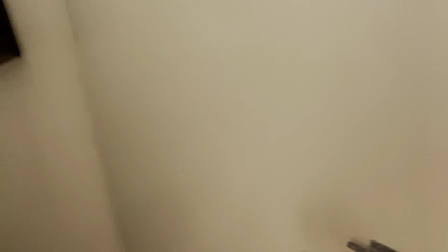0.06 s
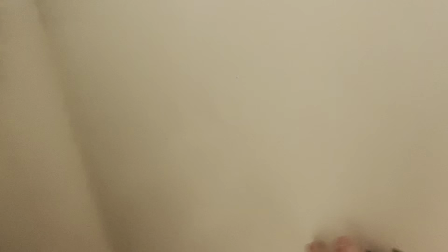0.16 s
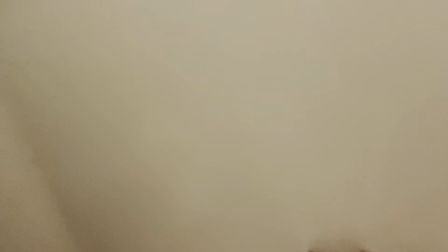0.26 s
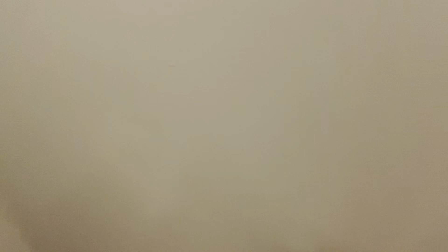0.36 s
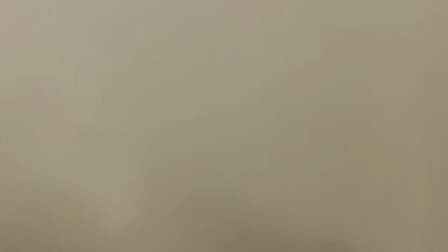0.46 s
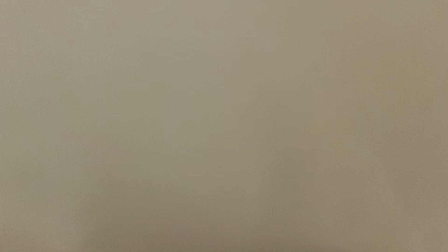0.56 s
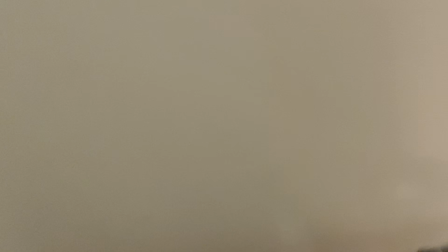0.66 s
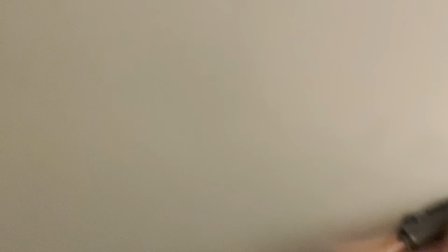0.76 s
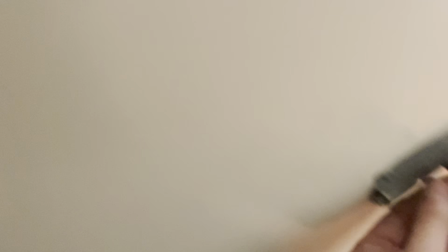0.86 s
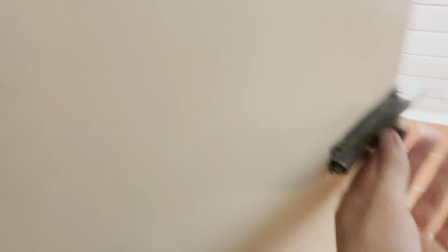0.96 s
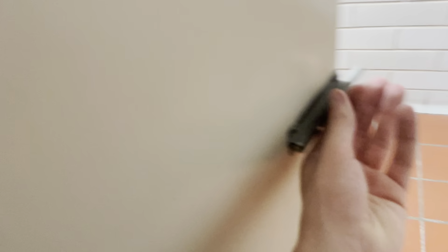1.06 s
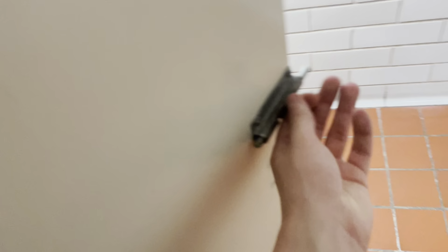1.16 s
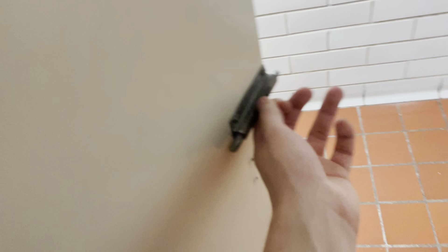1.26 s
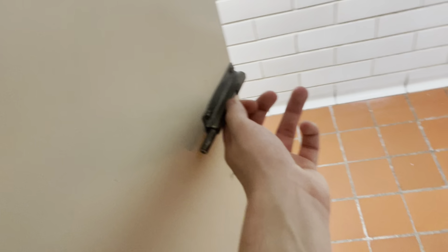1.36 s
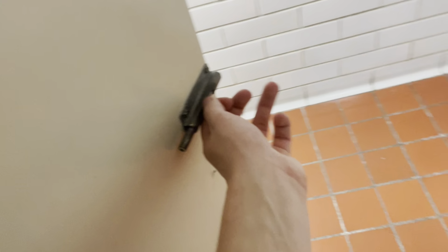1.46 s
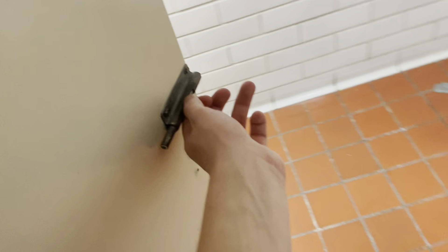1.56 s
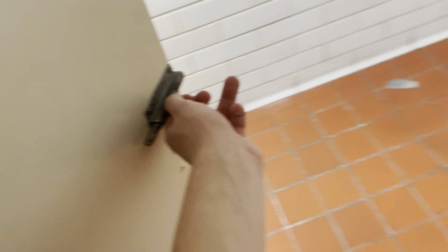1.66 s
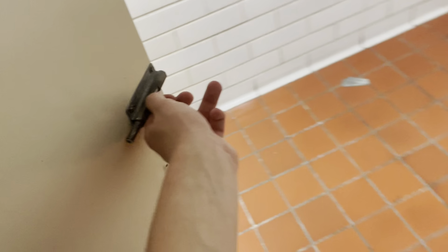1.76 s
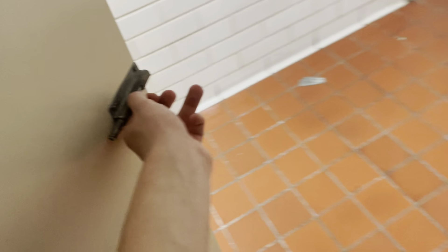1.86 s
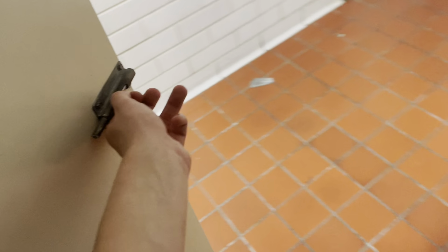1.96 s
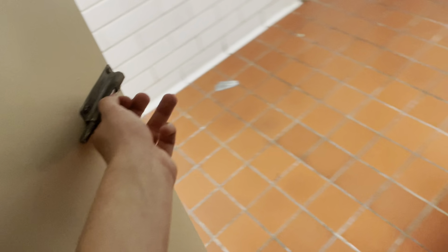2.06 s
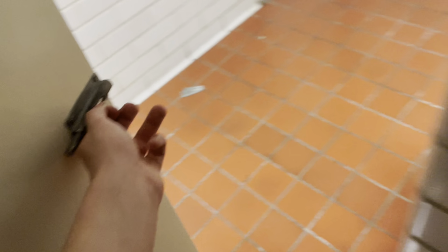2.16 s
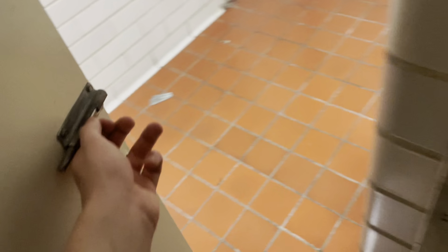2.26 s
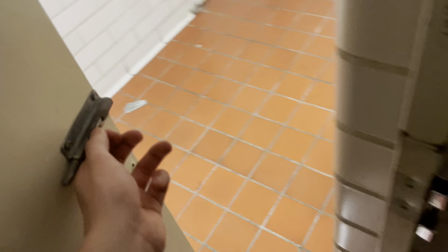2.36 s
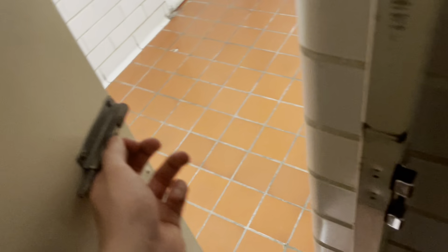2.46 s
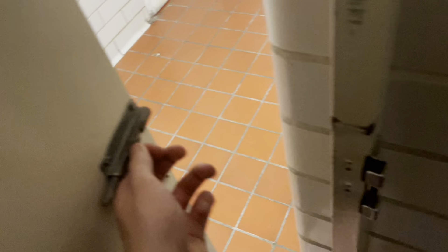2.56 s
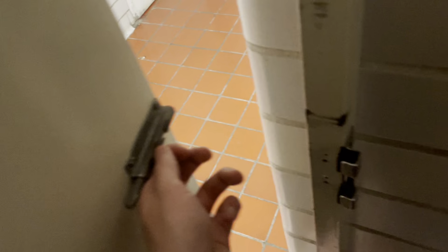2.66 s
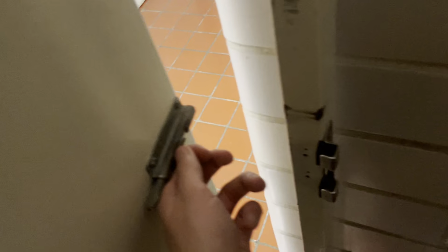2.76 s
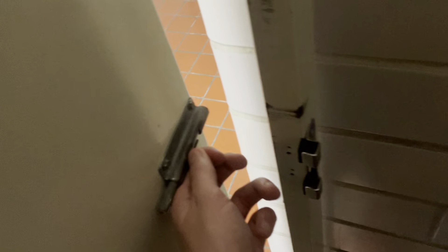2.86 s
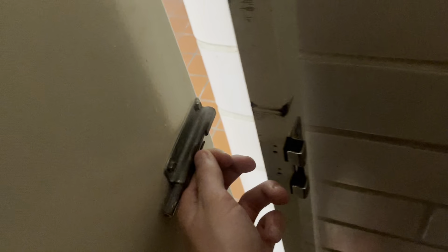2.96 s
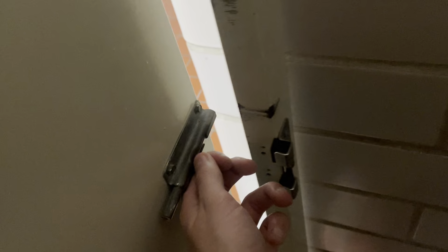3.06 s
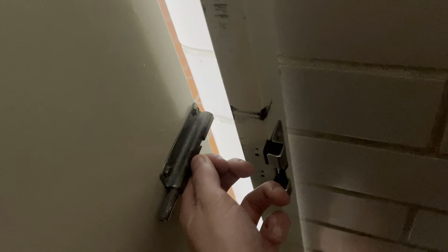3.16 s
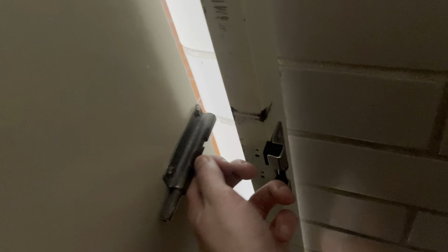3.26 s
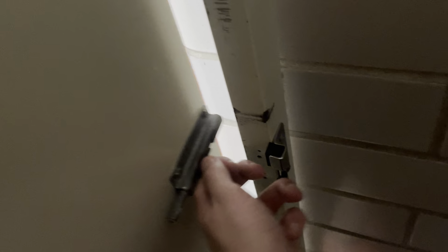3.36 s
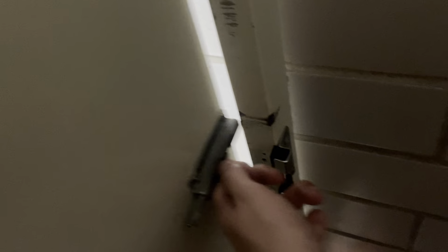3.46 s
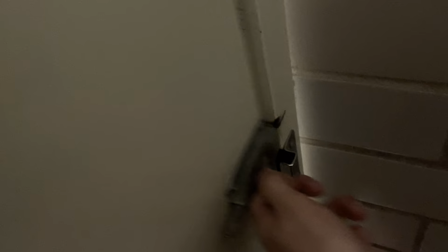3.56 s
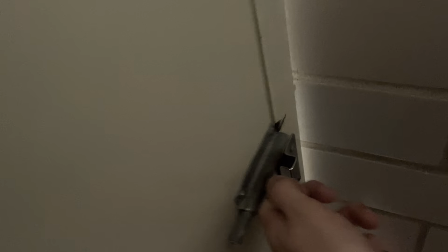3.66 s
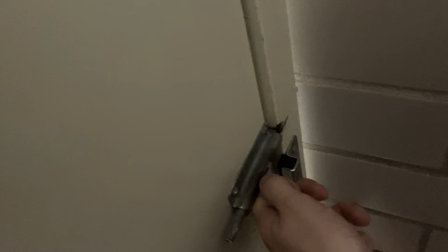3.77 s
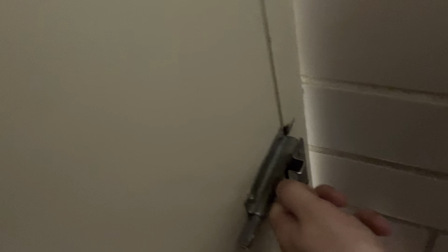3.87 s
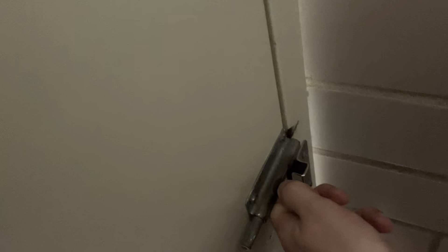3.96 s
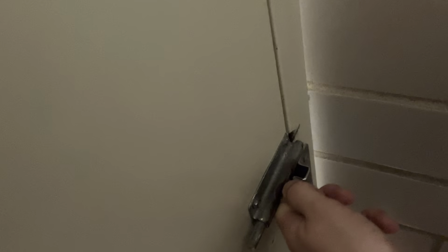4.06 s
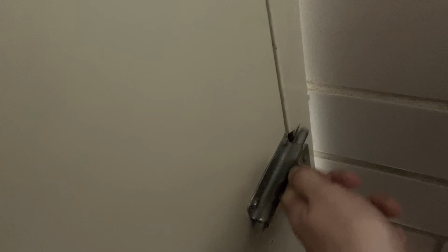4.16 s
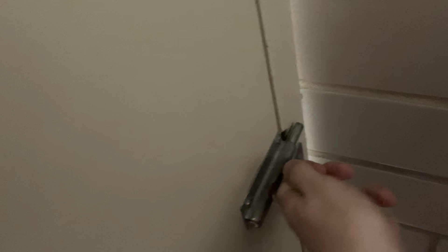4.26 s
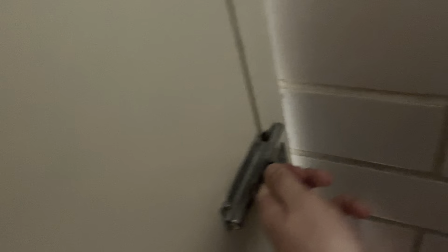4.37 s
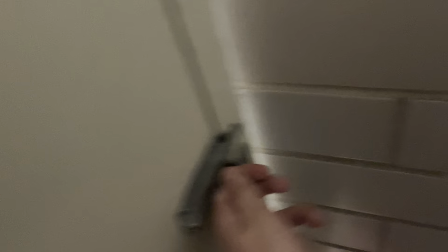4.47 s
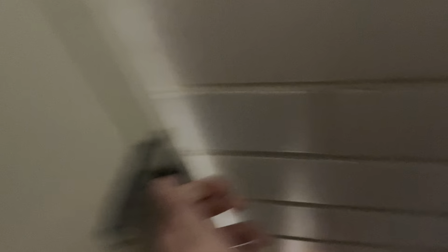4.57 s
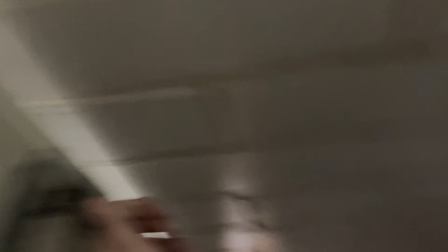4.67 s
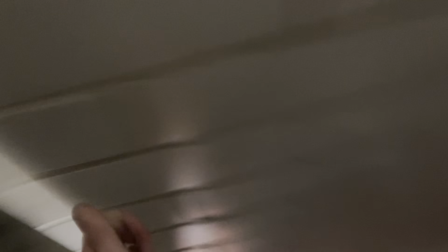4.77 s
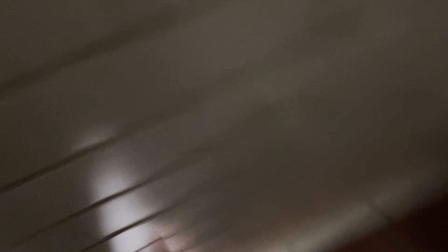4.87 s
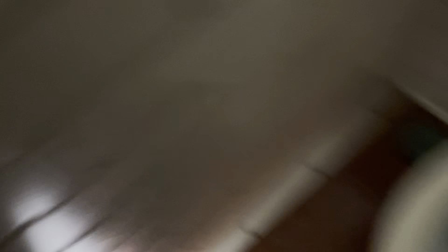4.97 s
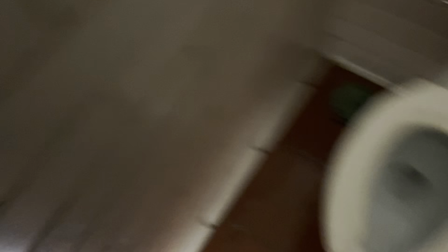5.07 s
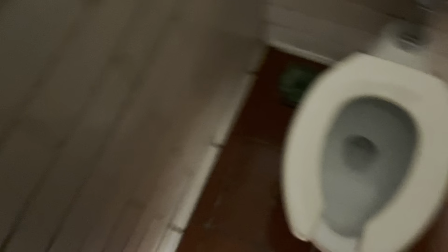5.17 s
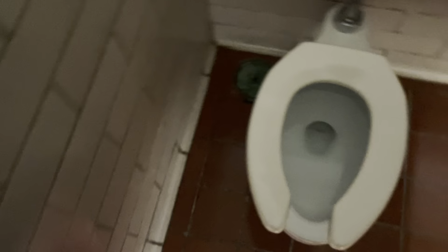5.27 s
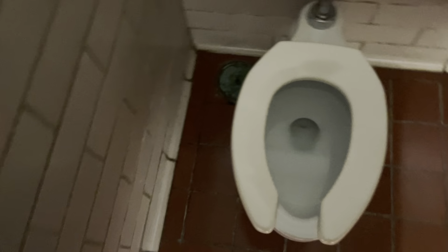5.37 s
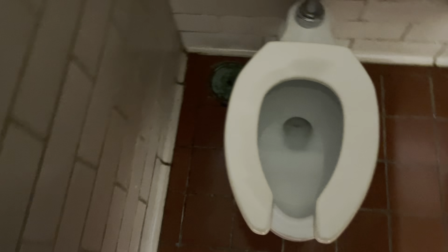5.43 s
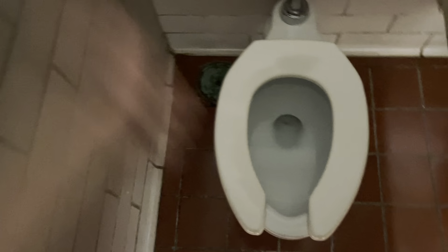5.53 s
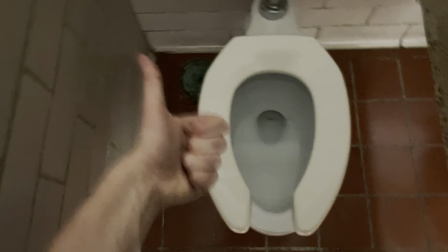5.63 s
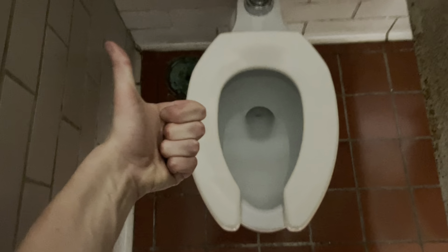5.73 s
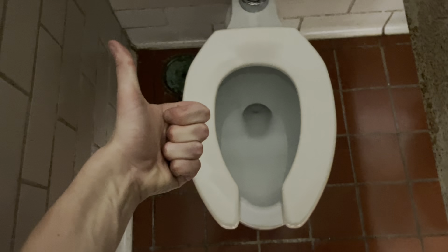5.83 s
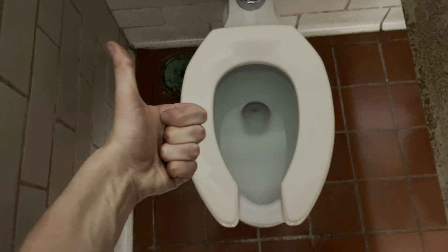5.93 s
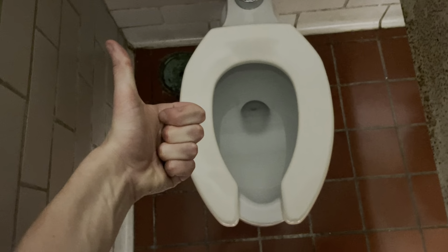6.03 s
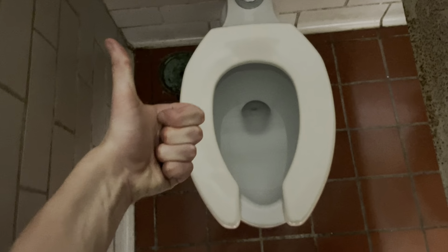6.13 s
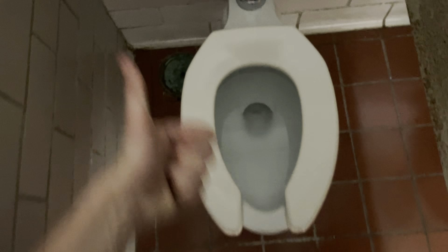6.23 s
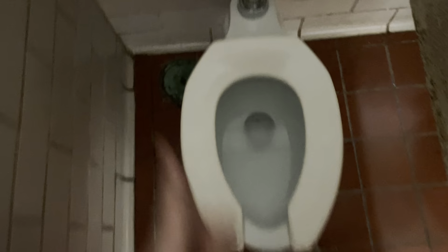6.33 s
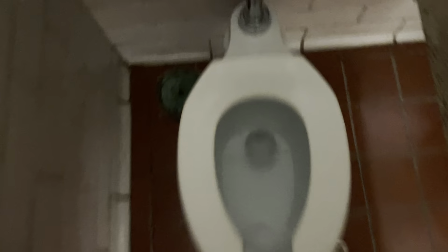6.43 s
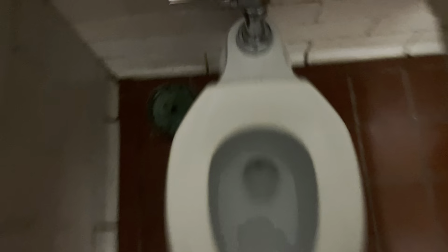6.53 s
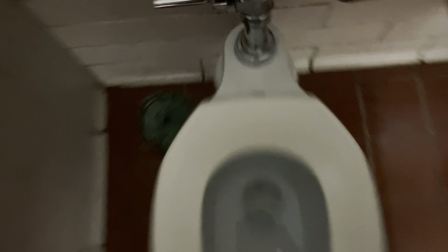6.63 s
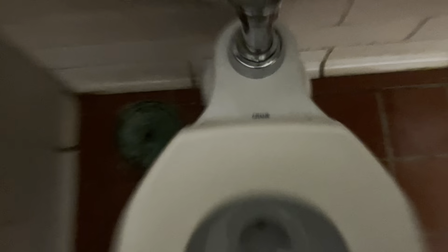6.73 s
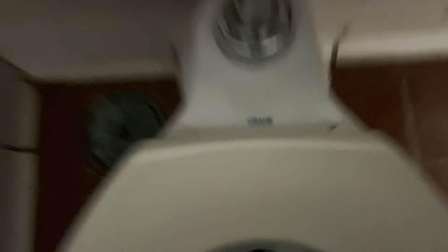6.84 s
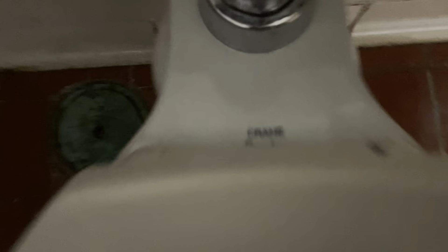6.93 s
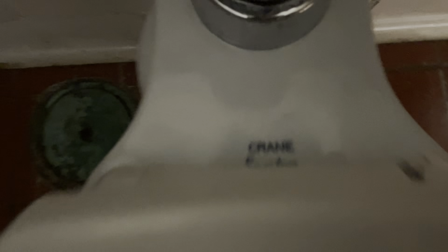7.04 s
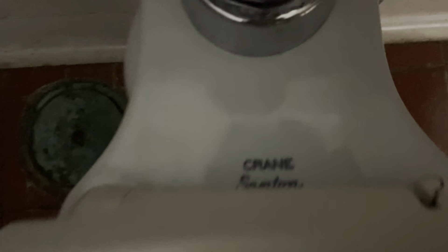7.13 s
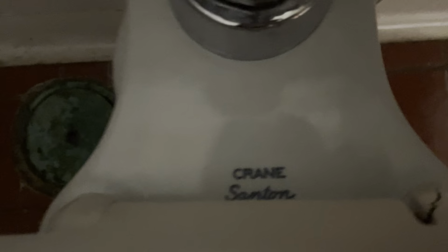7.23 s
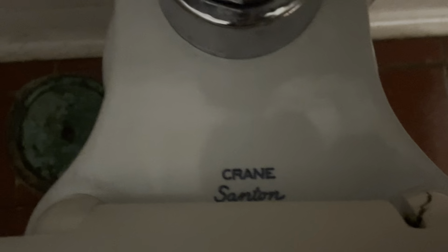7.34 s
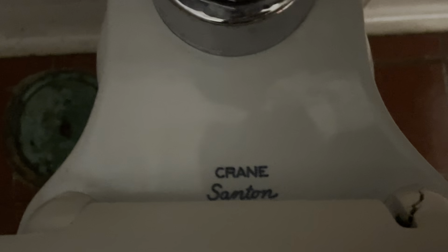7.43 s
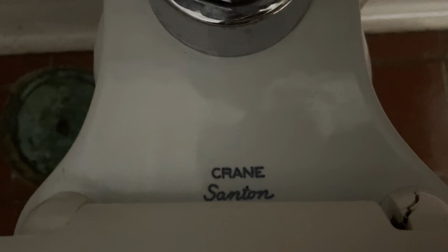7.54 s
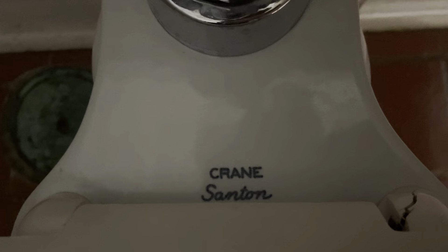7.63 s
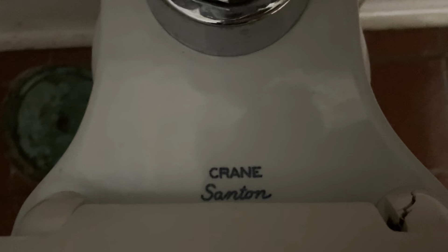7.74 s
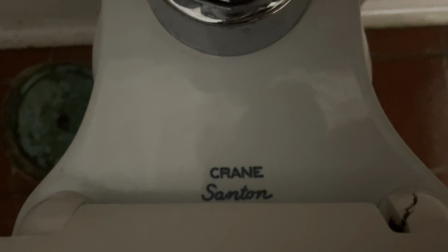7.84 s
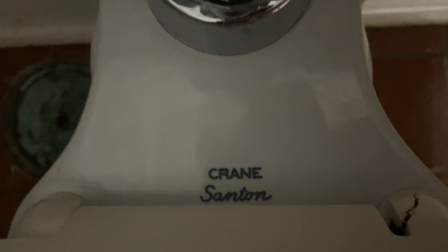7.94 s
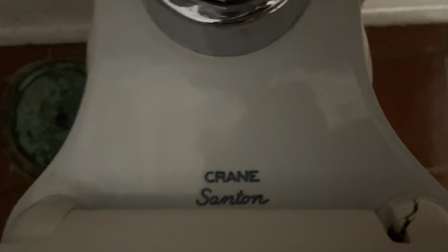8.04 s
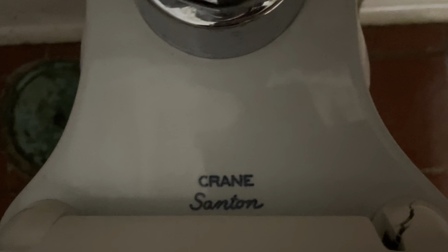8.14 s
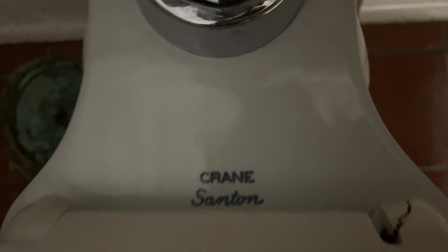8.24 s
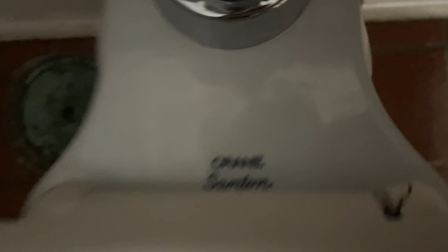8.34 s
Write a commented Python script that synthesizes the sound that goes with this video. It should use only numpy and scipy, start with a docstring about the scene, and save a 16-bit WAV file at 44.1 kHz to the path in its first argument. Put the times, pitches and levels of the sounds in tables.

```python
"""In a tiled restroom a stall door is swung shut: its loose slide bolt rattles in the hand, the panel
bangs on the frame, and the bolt is worked into its keeper. Then clothes rustle, a shoe lands and
fingers bump the microphone, over a low ventilation rumble. Metal and panel are struck resonators;
rubbing, airflow and reverberation are shaped noise."""
import sys
import numpy as np
from scipy import signal
from scipy.fft import rfft, irfft, next_fast_len
from scipy.io import wavfile

SR = 44100
rng = np.random.default_rng(int(sys.argv[2]) if len(sys.argv) > 2 else 0)


def wrap_up_sound(samples):
    """Save the sound to the file named by the first command line argument, as 16-bit audio."""
    columns = np.atleast_2d(samples).T
    # keep every value between -1 and 1, then stretch to whole-number steps
    tamed = np.clip(columns, -1, 1)
    steps = np.round(tamed * 32767).astype(np.int16)
    wavfile.write(sys.argv[1], SR, steps)


N = 370440
TIME = np.arange(N) / SR


def from_db(db):
    """Decibel law: 20 dB is a factor of ten in amplitude."""
    return 10 ** (np.asarray(db) / 20)


def rms_one(x):
    """Normalization to unit effective value."""
    return x / np.sqrt(np.mean(x ** 2) + 1e-20)


def unit_energy(x):
    """Normalization to unit energy, averaged over the channels."""
    return rms_one(x) / np.sqrt(x.shape[-1])


def peak_one(x):
    """Normalization to unit peak."""
    return x / np.abs(x).max()


def level_curve(rows):
    """Amplitude envelope: levels in decibels joined by straight lines."""
    return from_db(np.interp(TIME, *np.transpose(rows)))


def at_hz(points, hz):
    """Interpolation along a logarithmic frequency axis."""
    points = np.array(points)
    return np.interp(np.log(hz), np.log(points[:, 0]), points[:, 1])


def panned(balance_db):
    """Interaural level difference: gains for left and right, positive towards the left."""
    return from_db([[balance_db / 2], [-balance_db / 2]])


def butter(x, hz, kind, order=2):
    """Butterworth filtering: a maximally flat passband."""
    corner_hz = np.clip(hz, 10, SR * .45)
    sections = signal.butter(order, corner_hz, kind, fs=SR, output="sos")
    return signal.sosfilt(sections, x + 1e-18)


def add(track, s, sound):
    """Superposition: mixes a sound into a track at a time in seconds."""
    at = max(round(s * SR), 0)
    track[..., at:at + sound.shape[-1]] += sound[..., :N - at]


def convolve(x, response):
    """Linear convolution: plays a signal through a stereo impulse response."""
    return signal.oaconvolve(np.atleast_2d(x), response, axes=-1)[:, :N]


def drift(rate):
    """Random modulation: normal values, rate per second, joined by straight lines."""
    return np.interp(TIME * rate, np.arange(4000), rng.standard_normal(4000))


def stroke(length_s):
    """Envelope of rubbing: the movement swells, holds and lets go."""
    return signal.windows.tukey(max(int(length_s * SR), 2), .5)


def resonate(force, modes, spread_db=0):
    """Modal superposition: parallel two-pole resonances, their strengths varied by spread_db."""
    out = 0
    for hz, width_hz, db in modes:
        r = np.exp(-np.pi * width_hz / SR)
        zeros = [(1 - r * r) / 2, 0, (r * r - 1) / 2]
        poles = [1, -2 * r * np.cos(2 * np.pi * hz / SR), r * r]
        mode = signal.lfilter(zeros, poles, force)
        out = out + from_db(db + spread_db * rng.standard_normal()) * mode
    return out


def treble_dip(x, notch_hz=8350, notch_q=5):
    """Notch filter: a narrow dip in the treble, near 8.35 kHz."""
    return signal.lfilter(*signal.iirnotch(notch_hz, notch_q, fs=SR), x)


def beside_panel(x, lag_radians=1.9, lean_db=2.0, hollow_db=6.0):
    """Near field: the panel's low swing reaches the left port late and louder, most in the low middle."""
    split_hz = 430
    # the left channel's lows feed both ports, turned half the lag each way
    wave = signal.hilbert(butter(x[0], split_hz, "low", order=4))
    turn = np.exp(.5j * lag_radians * np.array([[-1], [1]]))
    low = (wave * turn).real * panned(lean_db)
    low = low + (panned(2 * hollow_db) - 1.5) * butter(low, [240, 380], "band", order=1)
    return low + butter(x, split_hz, "high", order=4)


# Likeness of the left and right noise: (pitch_hz, correlation [-1 to 1])
LIKENESS = [(50, 0.22), (130, 0.77), (1400, 0.31), (7000, 0.044)]


def stereo(mid, side, hz):
    """Interchannel coherence: left and right from two unrelated noises, alike as the room makes them."""
    alike = np.clip(at_hz(LIKENESS, hz), -1, 1)
    return np.sqrt(1 + alike) * mid + np.sqrt(1 - alike) * side * [[1], [-1]]


def noise(spectrum, size, t60s):
    """Frequency-dependent decay: stereo third-octave noises each die at their own rate; rms 1."""
    t, out = np.arange(size) / SR, 0
    bins, white = np.fft.rfftfreq(size, 1 / SR), rfft(rng.standard_normal((2, size)))
    half_band = 2 ** (1 / 6)
    for hz in 25 * 2 ** (np.arange(29) / 3):
        inside = (bins >= hz / half_band) * (bins < hz * half_band)
        mid, side = irfft(white * inside, size)
        decay = np.exp(-np.log(1000) * t / at_hz(t60s, hz))
        band = stereo(mid, side, hz) * decay
        # band amplitude follows the density times the root of the bandwidth
        out = out + from_db(at_hz(spectrum, hz)) * np.sqrt(hz) * rms_one(band)
    return rms_one(out)


def steady_noise(spectrum):
    """Spectral shaping: steady stereo noise of a given colour; rms 1."""
    size = next_fast_len(N)
    hz = np.maximum(np.fft.rfftfreq(size, 1 / SR), 1)
    mid, side = rfft(rng.standard_normal((2, size))) * from_db(at_hz(spectrum, hz))
    return rms_one(irfft(stereo(mid, side, hz), size)[:, :N])


# Reverberation times of the tiled room: (pitch_hz, t60_s)
ROOM_T60 = [(60, 4.1), (160, 1.2), (1000, 0.58), (14000, 0.43)]
# Decay times within the stall: (pitch_hz, t60_s)
STALL_T60 = [(60, 0.31), (5000, 0.1), (14000, 0.63)]


def reverberant(spectrum, room_db):
    """Coupled reverberation: a dense ring in the stall plus the tiled room's longer tail; energy 1."""
    stall = noise(spectrum, SR, STALL_T60)
    room = noise(spectrum, SR, ROOM_T60)
    return unit_energy(stall + from_db(room_db) * room)


# Ventilation level as the microphone turns: (start_s, level_db)
VENT = [(0, -45.5), (1.5, -52.5), (3.4, -54.5), (4.3, -45), (5.0, -51), (6.3, -58.5), (6.9, -48),
        (7.5, -57.5), (8.4, -51)]
# Spectrum of the moving air: (pitch_hz, density_db [dB per Hz])
AIR = [(25, -11.5), (55, 3), (100, -2.5), (200, -9.5), (450, -30), (950, -27), (1350, -40), (2400, -40),
       (3500, -45), (16000, -58.5)]


def ventilation(lean_db=1.5):
    """Broadband flow noise: a low, slightly uneven rumble fills the room."""
    return level_curve(VENT) * from_db(drift(10)) * steady_noise(AIR) * panned(lean_db)


# Sleeve or trouser leg brushing with each movement: (start_s, length_s, level_db)
BRUSHES = [(0.212, 0.69, -63), (1.021, 0.56, -63), (1.697, 0.52, -67), (2.224, 0.04, -54.5),
           (2.587, 0.022, -62), (4.777, 0.13, -64), (4.958, 0.09, -60), (5.232, 0.045, -58),
           (5.44, 0.035, -71), (5.951, 0.11, -61.5), (6.194, 0.086, -64), (6.441, 0.22, -53.5),
           (6.558, 0.65, -61.5)]
# Spectrum of rubbed cloth: (pitch_hz, density_db [dB per Hz])
CLOTH = [(400, -8), (750, -13.5), (1100, -6.5), (1600, -14), (2350, -9.5), (7300, -20.5), (8100, -47.5),
         (9230, -23), (13300, -28.5), (15000, -62)]
# Even reflection of the rustle by the tiles: (pitch_hz, density_db [dB per Hz])
EVEN = [(1000, 0)]


def clothes(snaps_per_s=260, snap_db=4, scuff_db=3, wet_db=-2, room_db=0):
    """Fabric friction: brushes swell in uneven scuffs with tiny snaps of the folds, and linger."""
    rubbing = np.zeros(N)
    for s, length, db in BRUSHES:
        add(rubbing, s, from_db(db) * stroke(length))
    # snaps fall at random and each dies away in about a millisecond
    snaps = (rng.random(N) < snaps_per_s / SR) * np.minimum(rng.exponential(1, N), 3)
    snaps = signal.lfilter([1], [1, -np.exp(-1 / (.001 * SR))], snaps)
    scuffs = from_db(scuff_db * drift(40))
    folds = rms_one(1 + from_db(snap_db) * snaps)
    cloth = rubbing * scuffs * folds * steady_noise(CLOTH)
    return cloth + from_db(wet_db) * convolve(cloth, reverberant(EVEN, room_db))


# Finger knocks on the microphone housing: (start_s, level_db, lowpass_hz)
BUMPS = [(2.991, -42.5, 596), (3.087, -45, 1087), (4.807, -41.5, 663), (5.505, -38.5, 495),
         (5.565, -43, 436), (5.743, -39, 827), (5.84, -40.5, 483), (6.072, -42.5, 444), (6.168, -38, 536),
         (6.564, -34, 438), (6.654, -41.5, 453), (8.323, -34, 414)]
# Light touches while the grip shifts, one row: (start_s, end_s, mean level_db, highest lowpass_hz)
FIDGET = (5.5, 6, -51.5, 718)
TOUCH_COUNT = 28


def bumps(decay_s=0.0081, highest_thump_hz=110, thump_db=-8):
    """Structure-borne sound: fingers give dull, dry knocks over a soft thump, and lighter touches."""
    out, t = np.zeros((2, N)), np.arange(4096) / SR
    thump_s = .012  # time to the thump's fullest swing
    start_s, end_s, touch_db, touch_hz = FIDGET
    touches = []
    for _ in range(TOUCH_COUNT):
        touches.append((rng.uniform(start_s, end_s), rng.normal(touch_db, 1.4),
                        touch_hz * rng.uniform(0.56, 1)))
    for s, db, high_hz in BUMPS + touches:
        # one part common to both channels, one part separate
        push = rng.standard_normal(len(t)) + .5 * rng.standard_normal((2, len(t)))
        knock = butter(push * np.exp(-t / decay_s), high_hz, "low", order=4)
        knock = butter(knock, 150, "high")
        thump_hz = highest_thump_hz * rng.uniform(0.43, 1)
        thump = t / thump_s * np.exp(1 - t / thump_s) * np.sin(2 * np.pi * thump_hz * t)
        add(out, s, from_db(db) * (peak_one(knock) + from_db(thump_db) * thump))
    return out


# Shoe landing on the tiles: (start_s, peak level_db)
STEPS = [(5.237, -39.5), (6.7297, -19)]
# Spectrum of the shoe: (pitch_hz, density_db [dB per Hz])
SHOE = [(47, -28), (90, 6.5), (400, -8), (720, -3), (1200, -10), (2000, -25), (3600, -17.5), (14000, -41)]


def steps(slap_db=4, slap_s=0.0064, room_db=-7):
    """Impact and reverberation: a sole slaps the tiles and the room answers."""
    attack = from_db(slap_db * np.exp(-np.arange(SR) / SR / slap_s))
    slap = peak_one(attack * reverberant(SHOE, room_db))
    out = np.zeros((2, N))
    for s, db in STEPS:
        add(out, s, from_db(db) * slap)
    return out


# Grumble of the panel swinging on its hinges: (start_s, level_db)
SWING = [(0, -60.5), (1.2, -53.5), (2.0, -61), (2.8, -56), (3.3, -80.5)]


def swing(low_hz=220, high_hz=420):
    """Band-limited noise: the moving panel gives a hollow, wandering grumble."""
    grumble = butter(rng.standard_normal((2, N)), [low_hz, high_hz], "band")
    return level_curve(SWING) * from_db(2 * drift(12)) * rms_one(beside_panel(grumble))


# Squeaks and rasps of hinge and fittings: (start_s, length_s, pitch_hz, width_hz, level_db)
SQUEAKS = [(0.12, 0.023, 1110, 700, -50.5), (0.215, 0.067, 4230, 500, -54), (0.33, 0.14, 1050, 70, -53.5),
           (2.708, 0.11, 1377, 790, -68.5), (7.016, 0.051, 1014, 30.2, -51.5)]


def squeaks():
    """Random stick-slip excites one resonance: a rasp when it is wide, a thin squeak when narrow."""
    out = np.zeros(N)
    for s, length, hz, width_hz, db in SQUEAKS:
        size, mode = max(int(length * SR), 2), [(hz, width_hz, 0)]
        # resonated twice; the last stretch has settled
        rasp = resonate(resonate(rng.standard_normal(SR), mode), mode)[-size:]
        add(out, s, from_db(db) * np.hanning(size) * rms_one(rasp))
    return out


# Bolt sliding in its sleeve: (start_s, length_s, relative level_db)
SLIDES = [(0.222, 0.092, -52.5), (3.586, 0.2, -41), (4.134, 0.17, -50.5), (4.442, 0.072, -34.5)]
# Broad resonances of the hand-held latch: (pitch_hz, width_hz, level_db)
BOLT = [(1060, 1100, -4.5), (2365, 490, -0.5), (3790, 1100, -0.5), (6300, 900, -18), (9904, 1700, -7)]
# The bar's own bending mode: (pitch_hz, width_hz, level_db)
BAR = [(4940, 290, 0.5)]
# Spectrum of the bolt's tail: (pitch_hz, density_db [dB per Hz])
BOLT_RING = [(150, -10), (350, 14.5), (1000, 3.5), (2000, -4.5), (5100, -1.5), (7200, -10.5),
             (10200, -16.5), (14500, -34.5)]


def slides(grain_db=4, wet_db=1, room_db=-3):
    """Sliding friction: metal catching on countless tiny ridges is grainy noise through its modes."""
    friction = np.zeros(N)
    for s, length, db in SLIDES:
        add(friction, s, from_db(db) * stroke(length))
    ridges = rng.standard_normal(N) * from_db(grain_db * drift(400))
    scrape = friction * rms_one(resonate(ridges, BOLT + BAR))
    return (scrape + from_db(wet_db) * convolve(scrape, reverberant(BOLT_RING, room_db))) / 2


# Blows on the door panel: (start_s, relative level_db, contact lowpass_hz, extra level_db of first swings)
BANGS = [(0.823, -27.5, 891, 2), (0.857, -27, 700, 4), (1.044, -31, 885, 9), (3.6393, -8.5, 1608, 6),
         (3.705, -10.5, 370, 1), (3.897, -10, 140, 9.5)]
# Modes of the door panel: (pitch_hz, level_db, t60_s)
PANEL = [(47.4, -4, 0.43), (77.8, -5.5, 0.073), (159.95, -0.5, 0.67), (263, -6.5, 0.28), (284.5, -6, 0.41),
         (368, 0.5, 0.34), (705.4, -8, 0.56), (936, -17.5, 0.53)]
# Spectrum of the panel's boom: (pitch_hz, density_db [dB per Hz])
BOOM = [(25, -20.5), (50, 1), (170, 1.5), (320, 0), (480, -12.5), (680, 0.5), (950, -13.5), (4000, -25.5)]


def door(modes_db=1, boom_db=20, room_db=-1, slam_s=0.013):
    """Modal excitation: each blow rings the panel anew under a dense boom; soft contacts stay low."""
    t = np.arange(SR) / SR
    boom, out = reverberant(BOOM, room_db), np.zeros((2, N))
    for s, db, contact_hz, slam_db in BANGS:
        modes = 0
        for k, (hz, mode_db, t60) in enumerate(PANEL):
            envelope = from_db(mode_db + rng.normal(0, 4) - 60 * t / t60)
            modes = modes + envelope * np.sin(2 * np.pi * hz * t) * (-1) ** k
        response = from_db(boom_db) * (boom + from_db(modes_db) * unit_energy(modes))
        # the first swings, before the frame soaks them up, are the widest
        blow = response * from_db(db + slam_db * np.exp(-t / slam_s))
        add(out, s, butter(blow, contact_hz, "low"))
    return beside_panel(out)


BOUNCE_GAP_S = 0.0016  # mean time between bounces
RATTLE_FADE_DB = 25  # mean fade over the length of a rattle


def bounces(rattle_s, count=32):
    """Inelastic rebound: a contact and its fading bounces, uneven in gap, strength and sign, as clicks."""
    times = np.append(0, np.cumsum(BOUNCE_GAP_S * rng.uniform(.3, 1.7, count)))
    kicks = np.append(1, from_db(rng.normal(-2, 2.5, count)) * rng.choice([-1, 1], count))
    train = np.zeros(int(times[-1] * SR) + 1)
    train[(times * SR).astype(int)] = kicks * from_db(-RATTLE_FADE_DB * times / max(rattle_s, 1 / SR))
    return train


# Metal contacts of the bolt: (start_s, relative level_db, treble gain_db, bar ring level_db, rattle length_s)
CLACKS = [(0.190, -37, -18, 2, 0.0014), (0.306, -33, -20, -21, 0.0088), (0.435, -12, -24, 20, 0.0017),
          (0.4425, -22.5, -11, 8, 0.0022), (0.4836, -23.5, 12, -10, 0.005), (0.494, -20.5, 1, 33, 0.0042),
          (0.529, -20, 19, 20, 0.002), (0.7705, -7.5, -12.5, 1, 0.0055), (0.7733, -10, -9, 3, 0.0049),
          (0.8218, -5.5, 16, 14.5, 0.0022), (0.8523, -14, -5.5, 0.5, 0.022), (0.8563, -6, 0, -2.5, 0.012),
          (1.026, -14.5, -1, 8, 0.0069), (1.042, -8, -25, 12.5, 0.0019), (1.0627, -24.5, -10, 3, 0.0051),
          (1.2423, -12, -39, 6.5, 0.0014), (1.3241, -28, -29, 5, 0.0031), (3.41, -25.5, 3, -18, 0.0033),
          (3.638, -8.5, 9, 2.5, 0.022), (3.703, -22, 2.5, -20, 0.094), (3.8985, -33.5, -6, -15, 0.019),
          (3.915, -36, -21, -21, 0.09), (4.019, -30, -22, -20, 0.0029), (4.114, -35, -4, -24, 0.0024),
          (4.227, -2, 6.5, 15.5, 0.004), (4.377, -26.5, 5, 8, 0.024), (4.4507, -22.5, -18, -18, 0.012),
          (4.4822, -9.5, 16, 2, 0.0032), (7.0245, -37.5, -12, -28.5, 0.0056)]
# Knock of the keeper on the frame: (pitch_hz, width_hz, level_db)
KEEPER = [(1140, 1400, -5)]
# Thin modes of the latch that sing on after a contact: (pitch_hz, level_db)
SINGING = [(2400, -4), (3700, -4.5), (5110, 0.5)]
SINGING_WIDTH_HZ = 220
SHUT_S = 3.6  # from here on the door lies against its frame
SHUT_DAMPING_HZ = 594  # the frame damps the ring below this
# share of a full blow passed to the door, and dB more per dB that the blow is softer
PANEL_SHARE_DB, PANEL_SHARE_SLOPE = -7.5, 0.31


def clacks(chatter_db=-23, chatter_s=0.0028, treble_hz=7000, dry_db=11.0, ring_db=10.5, room_db=-8,
           body_lean_db=-7, bar_lean_db=3):
    """Impact excitation: each contact is a sharp, bouncing crack that sets panel and room ringing."""
    t = np.arange(1024) / SR
    spread_s, lag_s = .0012, .00003  # spread of the arrival; delay at the right port
    at_port = t - np.array([[0], [lag_s]])
    # bending waves disperse in the metal: the treble arrives first, the lows a millisecond later
    sweep = signal.chirp(at_port, 17000, spread_s, 0, phi=90)
    arrival = sweep * (at_port >= 0) * (at_port < spread_s)
    # door and microphone keep moving, so successive contacts ring differently
    rings = [unit_energy(treble_dip(reverberant(BOLT_RING, room_db))) for _ in range(5)]
    singing_modes = [(hz, SINGING_WIDTH_HZ, mode_db) for hz, mode_db in SINGING]
    out = np.zeros((2, N))
    for k, (s, db, treble_db, bar_db, rattle_s) in enumerate(CLACKS):
        chatter = np.exp(-t / chatter_s) * rng.standard_normal((2, len(t)))
        force = unit_energy(arrival) + from_db(chatter_db) * chatter
        crack = resonate(force, BOLT, spread_db=1.5)
        crack = crack + (from_db(treble_db) - 1) * butter(crack, treble_hz, "high", order=1)
        # how much the bar sings depends on where it is struck
        crack = crack + from_db(bar_db) * resonate(force, BAR) * panned(bar_lean_db)
        push, ring = unit_energy(force[0]), rings[k % len(rings)]
        if s > SHUT_S:
            # the keeper knocks, and its grip halves the bolt's middle resonances
            gripped = crack - butter(crack, [2000, 4000], "band", order=1) / 2
            crack = gripped + resonate(force, KEEPER)
            push = butter(push, SHUT_DAMPING_HZ, "high", order=1)
        else:
            # the free latch sings on into the room
            ring = unit_energy(ring + resonate(ring, singing_modes))
        train = from_db(db) * bounces(rattle_s)
        share_db = PANEL_SHARE_DB - PANEL_SHARE_SLOPE * db
        blow = from_db(ring_db + share_db) * np.convolve(push, train)
        add(out, s, from_db(dry_db) * signal.fftconvolve(unit_energy(crack), train[None]))
        add(out, s, signal.fftconvolve(ring, blow[None]))
    # the latch's middle register is stronger on the right
    return out + (panned(body_lean_db) - 0.5) * butter(out, [900, 2400], "band", order=1)


def scene():
    """Superposition: ventilation, shoe steps and bolt slides have a narrow dip in the treble."""
    dipped = treble_dip(ventilation() + steps() + slides())
    return dipped + clothes() + bumps() + swing() + squeaks() + door() + clacks()


CUTOFF_HZ = 16500


def record(dry, rolloff_hz=13000):
    """Band limiting and soft saturation: deep bass and treble are shed, peaks rounded, the top cut."""
    coloured = butter(dry, rolloff_hz, "low", order=3)
    coloured = butter(coloured, 32, "high", order=3)
    top_cut = signal.ellip(10, .3, 70, CUTOFF_HZ, fs=SR, output="sos")
    return signal.sosfilt(top_cut, np.tanh(coloured))


dry = scene()
out = record(dry)
wrap_up_sound(out)
```